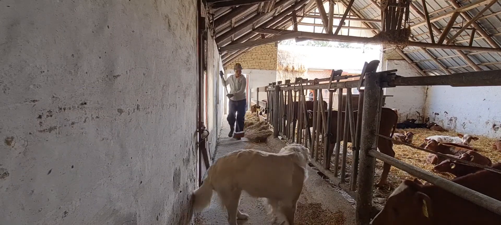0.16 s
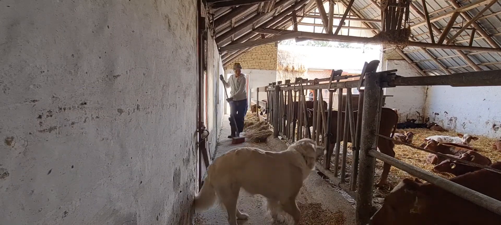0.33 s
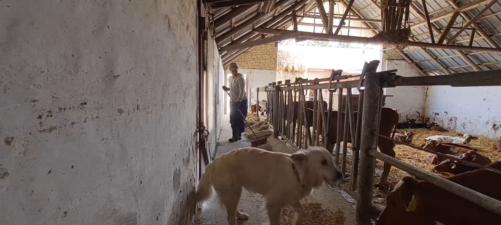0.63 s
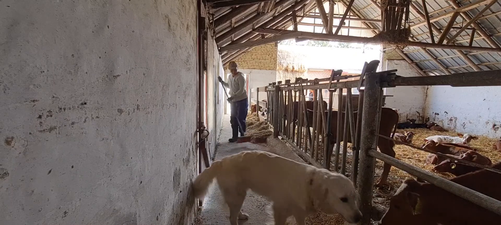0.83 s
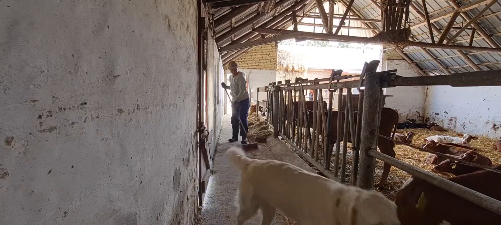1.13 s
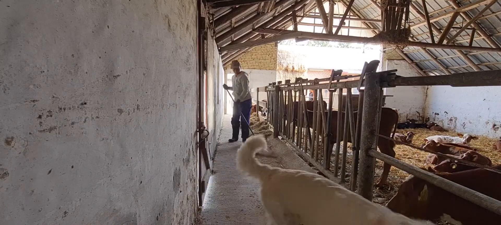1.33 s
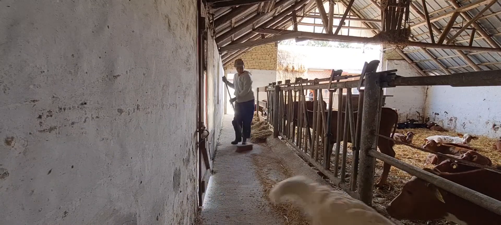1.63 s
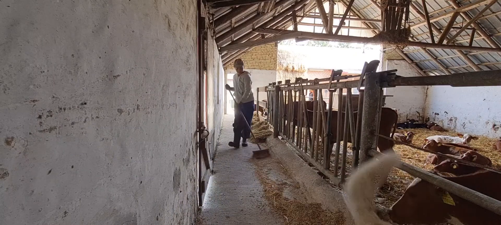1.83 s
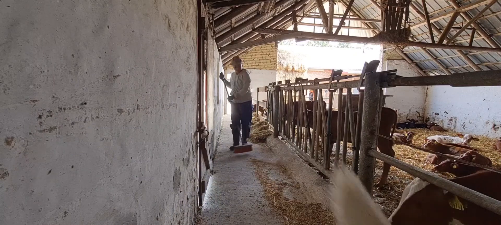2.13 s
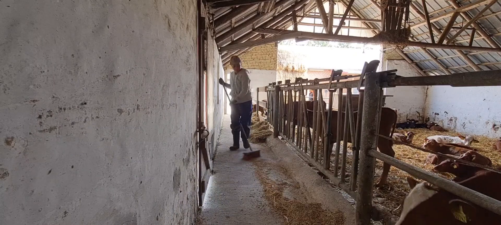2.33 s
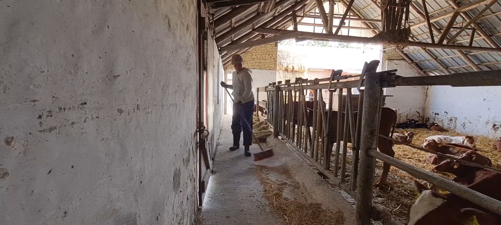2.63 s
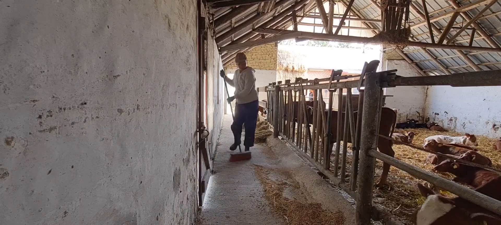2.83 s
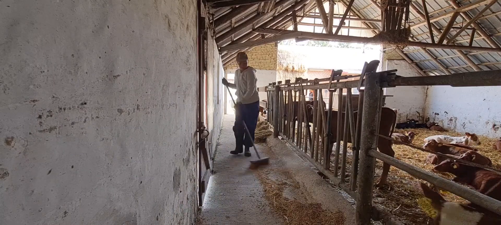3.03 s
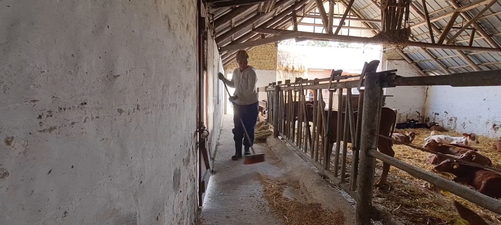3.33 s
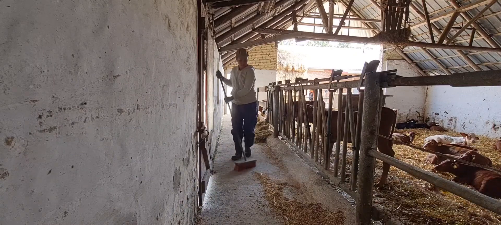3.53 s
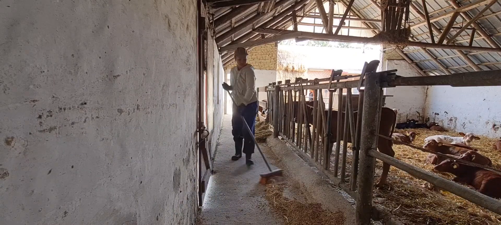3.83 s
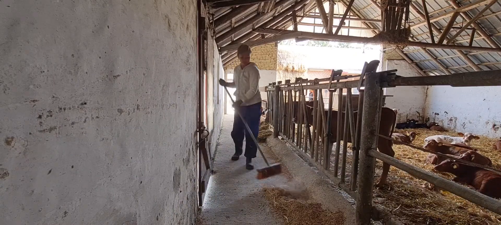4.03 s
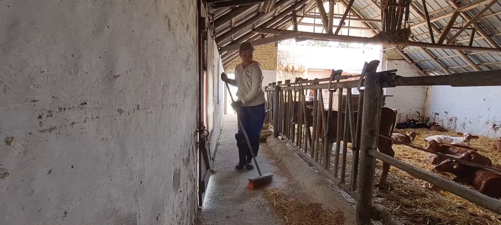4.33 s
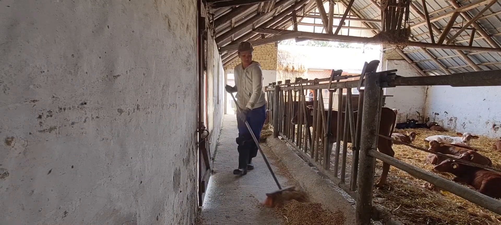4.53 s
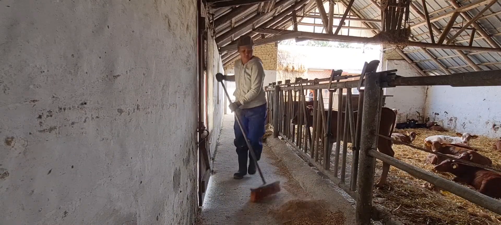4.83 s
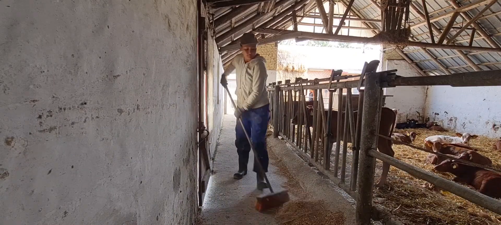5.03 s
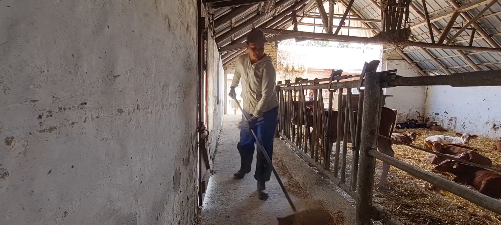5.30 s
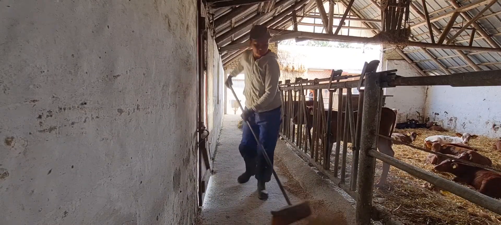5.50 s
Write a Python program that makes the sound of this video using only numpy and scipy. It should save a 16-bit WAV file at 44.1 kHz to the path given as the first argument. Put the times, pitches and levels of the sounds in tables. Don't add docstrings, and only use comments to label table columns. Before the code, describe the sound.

Soft knocks and rustling straw, a quick jingle of dog tags, then rhythmic bristle scrapes with wooden taps approaching along a barn floor.

```python
import sys
import numpy as np
from scipy import signal
from scipy.fft import rfft, irfft, next_fast_len
from scipy.io import wavfile
from scipy.ndimage import uniform_filter1d

SR = 44100
rng = np.random.default_rng(int(sys.argv[2]) if len(sys.argv) > 2 else 0)


def ratio(d):
    e = np.asarray(d, float) / 20
    return 10 ** e


def wav_record(signal):
    frames = np.transpose(np.atleast_2d(signal))
    bounded = np.clip(frames, -1, 1)
    quanta = np.round(bounded * 32767).astype(np.int16)
    wavfile.write(sys.argv[1], SR, quanta)


N = 249692
T = np.arange(N) / SR


def at_hz(points, n):
    hz, value = np.transpose(points)
    bins_hz = np.arange(n // 2 + 1) * SR / n
    return np.interp(np.log(bins_hz + 1), np.log(hz), value)


def colour(x, points, slope_db=0.):
    n = next_fast_len(x.shape[-1], real=True)
    tilt_db = at_hz([(625, -3 * slope_db), (20000, 2 * slope_db)], n)
    y = irfft(rfft(x, n) * ratio(at_hz(points, n) + tilt_db), n)[..., :x.shape[-1]]
    return y / np.sqrt(np.mean(y ** 2))


def walk(rate, channels=1):
    k = int(SR / rate)
    held = np.repeat(rng.standard_normal((channels, N // k + 1)), k, axis=1)
    slewed = uniform_filter1d(uniform_filter1d(held, k), k)
    return 1.38 * slewed[:, :N]


def ring(modes, gains_db, attack=0.00034, scatter=1.0, count=6000):
    hz, db, t60 = np.transpose(modes)[:, :, None]
    t = T[:count]
    phase = scatter * rng.uniform(0, 2 * np.pi, hz.shape)
    decay = 1000. ** (-t / t60)
    partials = ratio(db + gains_db) * decay * np.sin(2 * np.pi * hz * t + phase)
    return partials.sum(0) * (1 - np.exp(-t / attack))


def add(out, s, x):
    i = int(s * SR)
    out[:, i:i + x.shape[-1]] += x[..., :N - i]


def sides(pan_db):
    return ratio(np.array([[pan_db], [-pan_db]]) / 2)


def bumps(rows):
    power = sum(ratio(2 * (db - 10 * np.maximum((s - T) / rise, (T - s) / fall))) for s, db, rise, fall in rows)
    return 10 * np.log10(power + 1e-30)


# (frequency [Hz], density [dB per Hz])
BUILDING = [(15, -50), (35, -16.5), (54, -14), (100, -20.5), (160, -14.5), (200, -12.5), (224, -2),
            (260, -7), (327, -12), (394, -10.5), (460, -17), (600, -25.5), (1240, -39), (1950, -78)]
# (frequency [Hz], likeness [0-1])
COHERENCE = [(60, 0.95), (270, 0.95), (580, 0.56), (1200, 0), (12000, .05)]
# (time [s], peak level [dB])
FLOOR_TREADS = [(.2, -32), (.4, -45), (.95, -42), (1.1, -41), (1.5, -40), (1.86, -33.5), (2.1, -41),
                (2.45, -30.5), (2.65, -39), (3.05, -39.5), (3.2, -40.5), (3.82, -33), (4.13, -35.5),
                (4.471, -30.5), (4.701, -46), (5.2, -39), (5.44, -32), (5.66, -36)]


def drone():
    rise, fall = 0.068, .15
    tread_db = bumps([(s, db, rise, fall) for s, db in FLOOR_TREADS])
    calming_db = -42 - T
    shake = np.hypot(ratio(calming_db), ratio(tread_db))
    n = next_fast_len(N, real=True)
    alike = np.clip(at_hz(COHERENCE, n), 0, 1)
    mid, side = rfft(rng.standard_normal((2, n)))
    spectrum = np.sqrt(1 + alike) * mid + np.sqrt(1 - alike) * side * np.array([[1], [-1]])
    air = colour(irfft(spectrum, n), BUILDING)[:, :N]
    deep = signal.sosfiltfilt(signal.butter(2, 130, fs=SR, output="sos"), air)
    return ratio(-43.5 + 1.26 * walk(20)) * (air - deep) + shake * ratio(3.3 * walk(8)) * deep


# (frequency [Hz], density [dB per Hz])
FAR_AIR = [(800, -22), (1500, 2), (3000, -6), (5000, -5), (8000, -3), (10500, -7), (12000, -36)]


def hiss():
    return ratio(-71.5) * colour(rng.standard_normal((2, N)), FAR_AIR)


# (time [s], peak level [dB], rise [s per 10 dB], fall [s per 10 dB])
STRAW_RUSTLES = [(0.0, -48.5, .05, .1), (.18, -51, 0.022, 0.054), (.23, -56, .04, 0.069),
                 (.6, -48, .01, .04), (1.12, -62, .04, .04), (1.56, -53.5, .03, .06),
                 (1.67, -53, 0.023, 0.043), (2.85, -52.5, 0.038, 0.042), (2.93, -60, .03, 0.045),
                 (3.45, -45, .03, 0.048), (3.64, -61, 0.043, 0.072), (4.26, -48, 0.04, 0.076),
                 (4.98, -47.5, 0.091, 0.12), (5.18, -58, 0.056, 0.082), (5.47, -40, 0.14, 0.13),
                 (5.54, -46, 0.057, 0.042)]
# (peak level [dB], swell [s], contact [s], sag until the lift [dB], settling straw [dB])
PUSHES = [
    (-38, 0.12, 0.23, 2.5, -47.5),
    (-35.5, 0.17, 0.29, 2, -48.5),
    (-33.5, .17, 0.3, 6.5, -44.5),
    (-33.5, 0.14, 0.31, 5, -44),
    (-32, 0.15, 0.3, 7, -45.5),
    (-32.5, .16, .39, 7, -46),
    (-32, 0.14, .39, 10.5, -52),
    (-33, 0.24, 0.28, 7, -40),
]


def effort():
    swell_db, swell_power, touch_lag = 19.5, 1.91, .004
    lift_db_per_s, settle_db_per_s = 245, 64.5
    creak_db = -76
    straw_to_head = 0.24
    push = 1e-12
    straw = ratio(2 * bumps(STRAW_RUSTLES)) + ratio(2 * creak_db)
    for (land, *_), (peak_db, swell, contact, sag_db, settle_db) in zip(HEAD_LANDINGS, PUSHES):
        t = T - land
        lifted = np.maximum(t - contact, 0)
        gather_db = swell_db * np.clip(1 - t / swell, 0, 1) ** swell_power
        tire_db = sag_db * np.clip((t - swell) / (contact - swell), 0, 1) ** 2
        push_db = peak_db - gather_db - tire_db - lift_db_per_s * lifted
        straw_db = settle_db - settle_db_per_s * lifted
        push = push + np.clip(t / touch_lag, 0, 1) * ratio(2 * push_db)
        straw = straw + np.clip(t / contact, 0, 1) ** 2 * ratio(2 * straw_db)
    return 10 * np.log10(push + straw_to_head * straw), 10 * np.log10(push + straw)


# (frequency [Hz], density [dB per Hz])
BRISTLES = [(1000, -57), (1700, -15.5), (1950, -10.5), (2120, -5), (2260, -3.5), (2450, -7.5), (2900, -8),
            (3600, -8.5), (5500, -8.5), (7800, -9), (10400, -11.5), (11200, -18), (11700, -26.5),
            (12200, -52)]
# (frequency [Hz], density [dB per Hz])
HEAD_HUM = [(350, -12.5), (600, -7), (900, -7.5), (1250, -7), (1600, -10), (2200, -23)]
# (time [s], peak level [dB], rise [s per 10 dB], fall [s per 10 dB])
DULL_SCUFFS = [(.19, -52.5, .02, 0.067), (.42, -63, .05, 0.073), (.95, -55.5, 0.057, .12),
               (1.17, -47.5, .005, 0.068), (1.81, -57, .005, .06), (2.3, -51.5, .06, .08),
               (2.43, -48, .005, .05), (2.93, -56, 0.055, .08), (3.67, -56, .04, 0.043),
               (3.72, -43, .005, 0.087), (4.46, -49, .005, .06), (4.05, -54, .05, .05),
               (4.8, -55, 0.089, .06), (5.13, -55, .02, .06), (5.52, -54, 0.07, .06)]


def sweep():
    push_db, level_db = effort()
    over_db = level_db + 35
    hum = np.hypot(ratio(-50 + 0.51 * (push_db - level_db + over_db)), ratio(-68.5))
    hum = np.hypot(hum, ratio(bumps(DULL_SCUFFS)))

    lands = np.array(HEAD_LANDINGS)[:, 0]
    since = T - lands[np.searchsorted(lands, T) - 1]
    piling = np.where(since < 0, 0.24, np.minimum(since, 0.24))
    bright_db = 2.6 + 0.06 * over_db - 5 * piling

    snap_db = np.minimum(0.63 * rng.exponential(size=(2, N)), 8)
    slips = rng.standard_normal((2, N)) * (rng.random((2, N)) < .3) * ratio(snap_db)
    slips += 0.047 * slips[::-1]
    patchy = ratio(0.18 * walk(40) + 0.77 * walk(120, channels=2))
    share = np.clip(.5 + bright_db / 4, 0, 1)
    tips = share * colour(slips, BRISTLES, 2.) + (1 - share) * colour(slips, BRISTLES, -2.)
    head = colour(rng.standard_normal((2, N)), HEAD_HUM) * ratio(3.1 * walk(25, channels=2))
    return ratio(level_db) * sides(0.84) * patchy * tips + hum * head


# (time [s], peak level [dB], frequency [Hz], t60 [s])
SOFT_KNOCKS = [(.181, -16, 404, 0.039), (.197, -34, 468, 0.087), (.218, -24, 335, 0.071),
               (0.244, -33, 307.3, 0.081), (0.262, -25.5, 385, 0.036), (.298, -30.5, 268, 0.074),
               (1.668, -34.5, 273, 0.089), (2.165, -31, 229.6, 0.18), (2.184, -33, 268, 0.12),
               (3.649, -34, 230, 0.086), (3.712, -35, 702, .06), (4.042, -27.5, 242, 0.077),
               (4.261, -32, 254, 0.092), (4.8, -32, 213, .09), (4.95, -42, 332, 0.048),
               (4.981, -31.5, 228, 0.074), (5.229, -28.5, 418, 0.045), (5.402, -31.5, 197, 0.11),
               (5.426, -35, 73.9, 0.16), (5.489, -35, 70.4, 0.23), (5.607, -29, 225.8, 0.083)]


def thuds():
    out = np.zeros((2, N))
    for s, db, hz, t60 in SOFT_KNOCKS:
        modes = [(hz, 0, t60), (1.2 * hz, -8, 0.97 * t60), (2.83 * hz, -20, 0.49 * t60)]
        add(out, s, ratio(db) * ring(modes, 0, 0.0028, scatter=0, count=9000))
    return out


# (time [s], peak level [dB], left minus right [dB], frequency rung most [Hz],
# share of free ring time [0-1])
TAG_KNOCKS = [(.390, -40.5, 7, 8200, 0.02), (0.8993, -34, -1.5, 8100, 0.24), (.906, -37.5, -1, 6300, 1),
              (0.9251, -19.5, -1.5, 6300, 0.4), (.9285, -21, -2, 4730, 0.63), (0.932, -27, 13, 8800, 0.7),
              (0.9364, -19, -2, 8200, 0.8), (.940, -23.5, 9, 4640, 0.75), (.946, -37, -2, 6000, 0.63),
              (0.95, -31, 13, 7700, .5), (.958, -25, -7, 7700, 0.54), (0.9684, -23, 8, 4670, 0.41),
              (.980, -27, -16, 8600, 0.48), (0.9873, -20, 3, 5860, 0.35), (1, -23, 5, 4200, 0.5),
              (1.004, -32, -9, 7650, 0.68), (1.012, -33, -2, 4650, 0.6), (1.038, -48, -12, 8570, 0.3),
              (1.046, -48, 0, 5900, 0.46), (1.058, -59, -6.5, 7570, 0.55), (1.762, -51, -2, 7700, 0.6)]
# (frequency [Hz], level [dB], t60 [s])
TAG_MODES = [(2247, -3, 0.081), (2510, 0, 0.059), (4160, -3, 0.045), (4540, -10, .04), (4640, 3.5, 0.048),
             (4950, -8, .05), (5590, 2, 0.043), (5950, 3, 0.11), (6180, -1.5, 0.075), (6400, 0, 0.16),
             (6640, -6, 0.086), (7241, -12, .06), (7630, 0, 0.175), (8100, 4, 0.076), (8200, -3, 0.096),
             (8570, -0.5, 0.12), (9350, -4, 0.097), (9930, 1, 0.084)]


def collar():
    out, t, modes = np.zeros((2, N)), T[:6000], np.array(TAG_MODES)
    for s, db, pan_db, most_hz, free in TAG_KNOCKS:
        chance = rng.standard_normal((4, len(TAG_MODES), 1))
        octaves_off = np.abs(np.log2(modes[:, :1] / most_hz))
        share_db = 3 * chance[0] - np.minimum(40 * octaves_off, 13)
        detune = 1 + 0.004 * chance[1]
        same = np.ones_like(detune)
        struck = modes * np.hstack([detune, same, max(free, .05) * same])
        tone = np.array([ring(struck, share_db + 2 * chance[2 + k], 0.00077) for k in range(2)])
        tick = colour(rng.standard_normal((2, len(t))), BRISTLES) * 1000. ** (-t / 0.051)
        add(out, s, ratio(db - 7) * sides(pan_db) * (tone + ratio(-9.5) * tick))
    return out


# (time [s], peak level [dB], left minus right [dB], thump level [dB], burst t60 [s])
HEAD_LANDINGS = [
    (0.577, -48, 1.5, -48, 0.026),
    (1.158, -29.5, 4, -36, 0.021),
    (1.795, -30, .5, -25, 0.036),
    (2.415, -28.5, 3, -18.5, 0.03),
    (3.075, -32.5, 3, -53, 0.029),
    (3.709, -23.5, 2, -22, 0.043),
    (4.442, -20, 2, -32, 0.028),
    (5.084, -24.5, -0.5, -49, 0.062),
]
# (frequency [Hz], density [dB per Hz])
SLAP = [(410, -14), (700, -6.5), (1450, -6.5), (2270, -5.5), (2710, -7), (9800, -6.5), (10900, -10.5),
        (12000, -27), (15600, -62.5), (22000, -120)]
# (frequency [Hz], level [dB], t60 [s])
WOOD_MODES = [(825, 5, 0.027), (1218.3, 0.5, 0.16), (1680, -2.5, 0.21), (2258, 4, 0.09), (2935, 9, 0.019)]


def landings():
    out, t = np.zeros((2, N)), T[:6000]
    for s, db, pan_db, thump_db, t60 in HEAD_LANDINGS:
        burst = 1000. ** (-(t / t60) ** 2) * (1 - np.exp(-(t / 0.0018) ** 2))
        slap = colour(rng.standard_normal((2, len(t))), SLAP) * burst
        wood = [ring(WOOD_MODES, 2 * rng.standard_normal((len(WOOD_MODES), 1)), 0.002) for _ in range(2)]
        add(out, s, ratio(db - 6.5) * sides(pan_db) * (slap + ratio(-14) * np.array(wood)))
        thump = ring([(273, 0, .05)], 0, 0.00077, scatter=0)
        add(out, s - .003, ratio(thump_db - 4.0) * thump)
    return out


def barn(x):
    t60, room_db = 0.21, -8
    t = T[:int(.6 * SR)]
    tail = rng.standard_normal((2, len(t))) * 1000. ** (-t / t60) * (t > .006)
    tail *= ratio(room_db) / np.sqrt(np.sum(tail ** 2, axis=1, keepdims=True))
    return x + signal.fftconvolve(x, tail, axes=1)[:, :N]


def scene():
    return drone() + hiss() + sweep() + thuds() + barn(collar() + landings())


def band_limit(x):
    return signal.sosfilt(signal.butter(12, 12510, fs=SR, output="sos"), x)


def record(dry):
    low_cut = signal.butter(3, 36.9, "high", fs=SR, output="sos")
    top_cut = signal.cheby2(12, 40, 12390, fs=SR, output="sos")
    dry = signal.sosfiltfilt(low_cut, dry)
    dry = signal.sosfiltfilt(top_cut, dry)
    return band_limit(dry)


dry = scene()
out = record(dry)
wav_record(out)
```